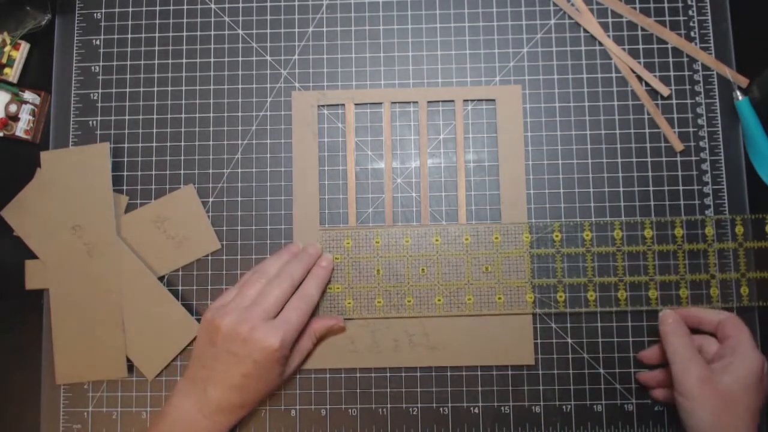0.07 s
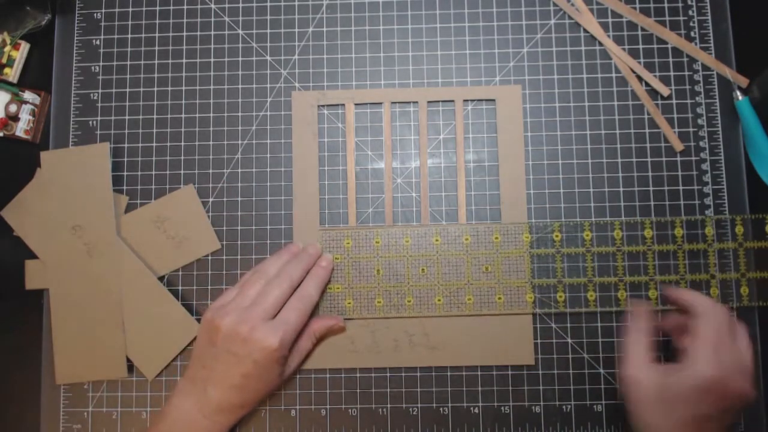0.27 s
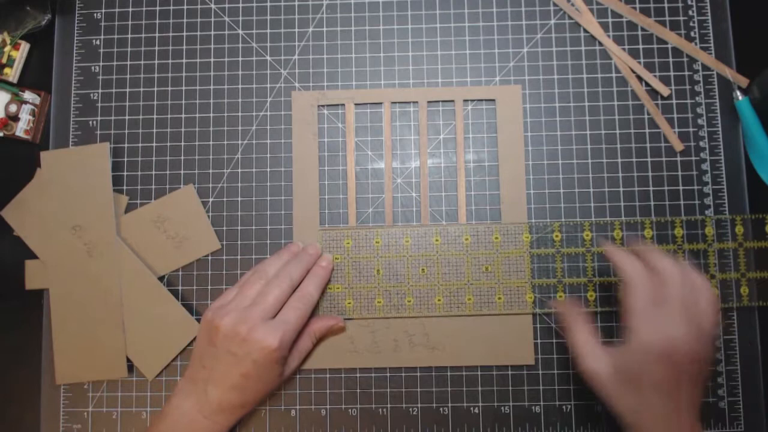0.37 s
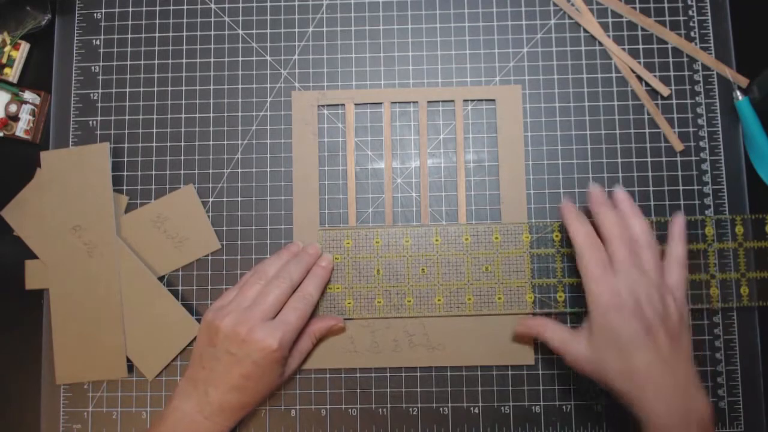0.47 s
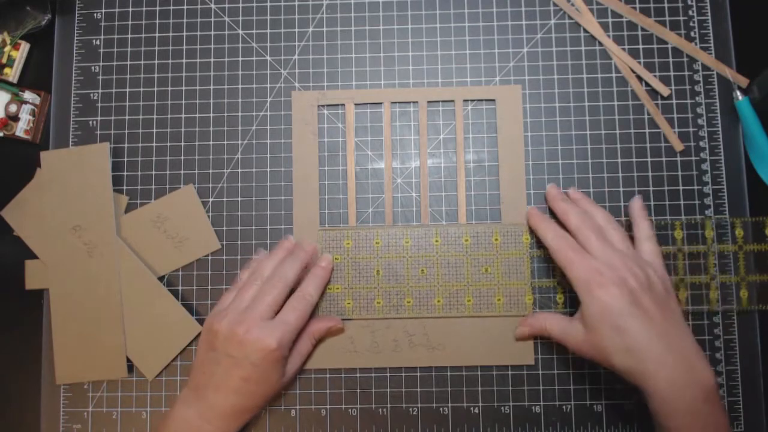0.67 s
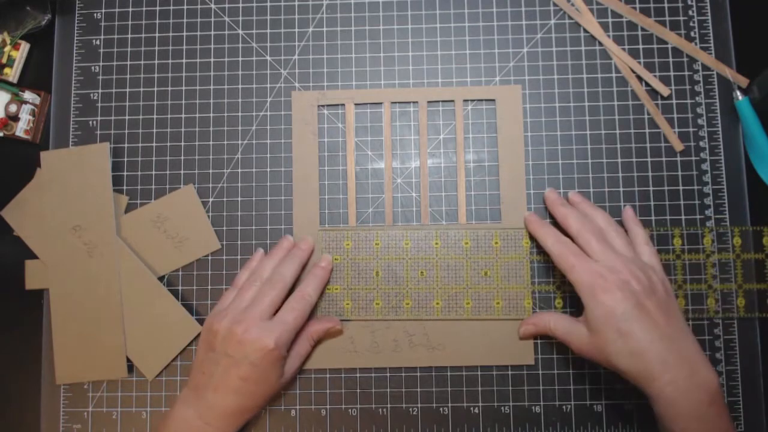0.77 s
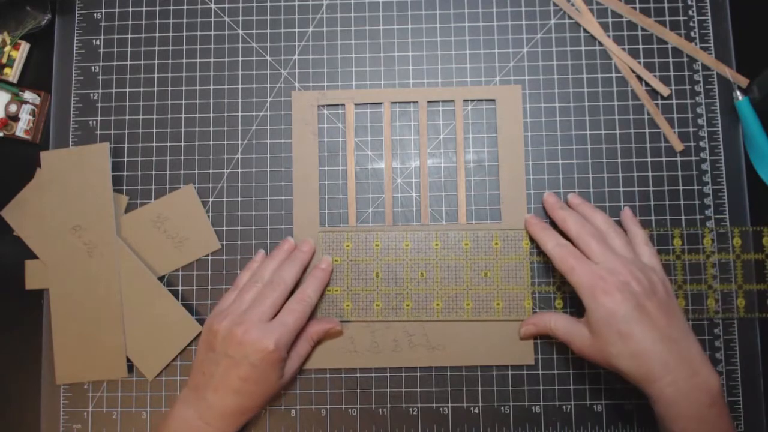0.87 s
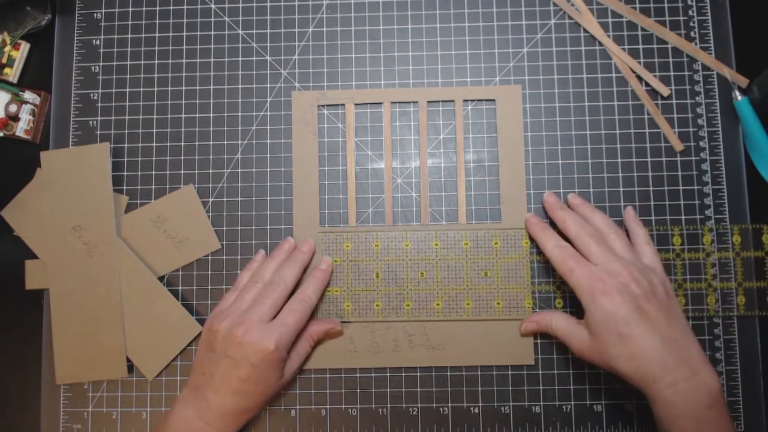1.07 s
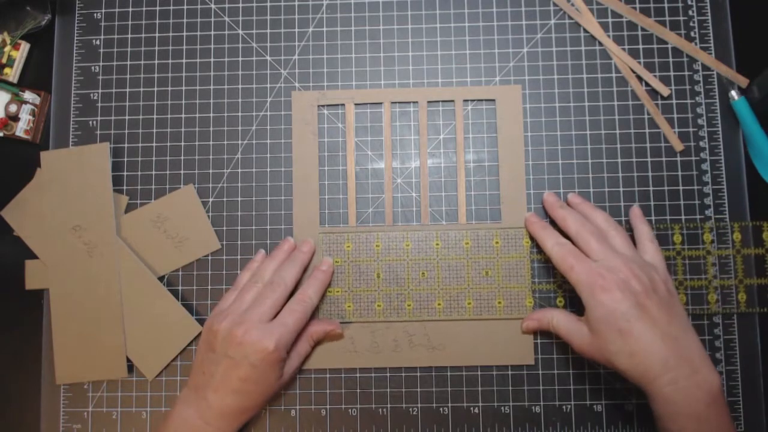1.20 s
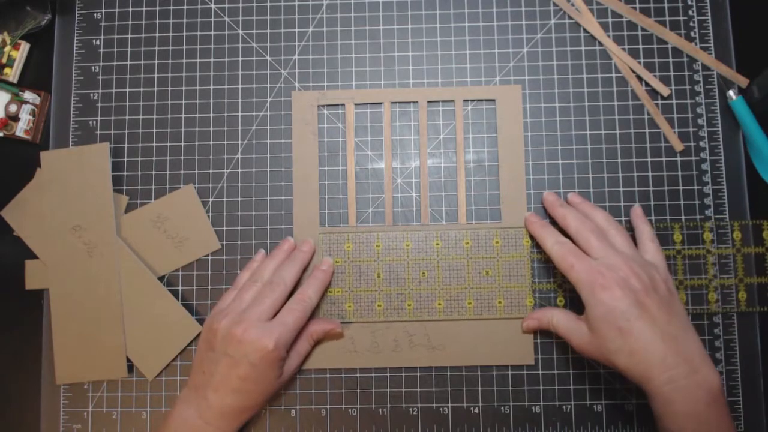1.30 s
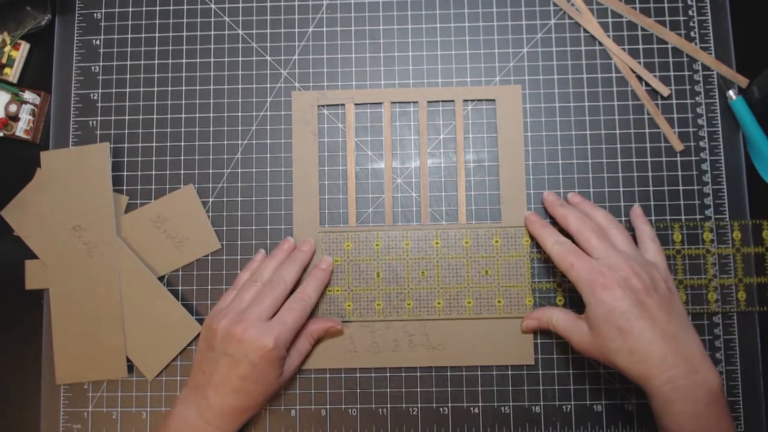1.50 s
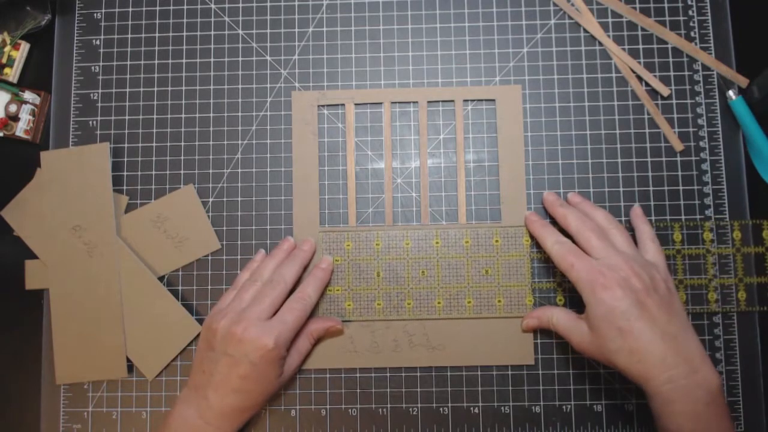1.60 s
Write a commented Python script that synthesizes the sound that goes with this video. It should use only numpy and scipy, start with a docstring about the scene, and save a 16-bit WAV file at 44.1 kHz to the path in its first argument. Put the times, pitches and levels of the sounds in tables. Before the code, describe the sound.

A flat plastic ruler hits a board panel on a table with two quick sharp taps, then after a pause slides briefly and clacks down duller; faint fingertip ticks follow, close microphone in a small quiet room.

```python
"""A clear acrylic ruler is set down on a board panel lying on a cutting mat: two sharp taps, then a short slide
and a duller clack as it is pressed flat, then light ticks and a dull fingertip touch.
Ruler contacts are damped modes plus a noise crack, and thump the modes of the table; slide, brushing hands
and ticks are coloured noise. A small room answers over a low hum and faint hiss."""
import sys
import numpy as np
from scipy import signal
from scipy.fft import rfft, irfft, next_fast_len
from scipy.io import wavfile
from scipy.ndimage import uniform_filter1d

SR = 44100
rng = np.random.default_rng(int(sys.argv[2]) if len(sys.argv) > 2 else 0)


def inscribe(sig):
    """Save sig as 16-bit PCM at rate SR to the path in sys.argv[1].

    A 1-D sig is mono; a 2-D sig holds one channel per row.
    Samples are clipped to [-1, 1] before scaling.
    """
    pcm = np.round(np.clip(np.atleast_2d(sig).T, -1, 1) * 32767)
    wavfile.write(sys.argv[1], SR, pcm.astype(np.int16))


N = 72765


def undb(db):
    """Decibels to gain."""
    return 10 ** (np.asarray(db) / 20)


def unit(x):
    """Scale to an rms of one."""
    return x / np.sqrt(np.mean(x ** 2))


def fade(t, t60_s):
    """Exponential decay, 60 dB down after t60."""
    return np.exp(-np.log(1000) * t / max(t60_s, 1e-4))


def since(start_s):
    """Seconds since a moment, zero before it."""
    return np.maximum(np.arange(N) / SR - start_s, 0)


def envelope(points):
    """Gain curve through (s, dB) points, straight in dB."""
    times_s, levels_db = np.array(points).T
    return undb(np.interp(since(0), times_s, levels_db))


def colour(x, points):
    """Minimum-phase filter through (Hz, dB) points, made causal by folding the cepstrum."""
    hz, db = np.array(points, float).T
    size = 2 * next_fast_len(N)
    bins_hz = np.maximum(np.fft.rfftfreq(size, 1 / SR), 1)
    log_gain = np.log(undb(np.interp(np.log(bins_hz), np.log(hz), db)))
    cepstrum = irfft(log_gain)
    cepstrum[1:size // 2] *= 2
    cepstrum[size // 2 + 1:] = 0
    response = np.exp(rfft(cepstrum))
    return irfft(rfft(x, size) * response)[:N]


def noise(points):
    """Coloured noise with an rms of one."""
    return unit(colour(rng.standard_normal(N), points))


def ring(t, modes):
    """Sum of exponentially damped sine modes (Hz, dB, t60 s)."""
    return sum(undb(db) * np.sin(2 * np.pi * hz * t) * fade(t, t60_s) for hz, db, t60_s in modes)


def background():
    """Room rumble and hiss as coloured noise, with a mains hum as one sine."""
    # Each row: frequency in Hz, spectral density in dB.
    hiss_colour = [(15, -45), (25, -13.5), (66, -3), (92, -15.5), (123, 2.5), (149, -16), (285, -22),
                   (354, -26), (439, -24.5), (503, -27.5), (818, -27.5), (962, -34.5), (1740, -31),
                   (2550, -38), (16000, -56.5)]
    hiss_db, hum_db, hum_hz = -57.5, -68, 120
    hum = unit(np.sin(2 * np.pi * hum_hz * since(0)))
    return undb(hiss_db) * noise(hiss_colour) + undb(hum_db) * hum


def brush():
    """Skin passing lightly over plastic and mat: a smooth bright hiss of varying level."""
    # Each row: frequency in Hz, spectral density in dB.
    brush_colour = [(500, -1.5), (2000, -7), (3400, 4), (5000, -2), (6800, 4.5), (8800, -6.5), (11000, -2),
                    (13500, -7.5), (16000, -6.5)]
    # Each row: time in seconds, level in dB.
    brush_level = [(0, -73), (0.037, -62.5), (.075, -72), (0.111, -75.5), (0.162, -68.5), (0.177, -54),
                   (.205, -61.5), (.33, -63), (0.413, -65), (.435, -82), (0.661, -75.5), (.77, -82),
                   (.83, -67.5), (0.879, -67.5), (.96, -59.5), (1.05, -76.5), (1.33, -81.5), (1.42, -70.5),
                   (1.5, -84.5), (1.65, -81)]
    return noise(brush_colour) * envelope(brush_level)


def table(t, column):
    """Boom of the table: damped modes, each building up over about its first cycle."""
    # Each row: frequency in Hz, level under a tap in dB, level under a press in dB, t60 in seconds.
    table_modes = [(38, -28, -39.5, 0.28), (60.97, -46, -35, 0.74), (73.68, -24, -24, 0.58),
                   (94.2, -28, -39.5, 0.14), (143.5, -37.5, -27.5, 0.23), (165.7, -28.5, -31, 0.12),
                   (239, -41.5, -52, 0.15), (340, -47.5, -43, 0.1695), (449, -49.5, -52, 0.33),
                   (511, -49, -54, 0.14), (630, -41, -43, 0.15)]
    rise_cycles = 0.53
    boom = np.zeros_like(t)
    for mode in table_modes:
        hz, db, t60_s = mode[0], mode[column], mode[-1]
        boom += ring(t, [(hz, db, t60_s)]) * (1 - np.exp(-t * hz / rise_cycles))
    return -boom


def hands():
    """Soft bumps of the hands on the table: slow pushes that reach only its lowest modes."""
    # Each row: start in seconds, level in dB, push length in seconds.
    bumps = [(0.047, -16, 0.018), (0.832, -8, 0.021), (0.8486, -3.5, 0.02), (.887, -16.5, 0.01067)]
    out = np.zeros(N)
    for start_s, db, length_s in bumps:
        push = np.sin(np.pi * np.minimum(since(start_s) / length_s, 1)) ** 2
        out += undb(db) * signal.fftconvolve(push / push.sum(), table(since(0), column=2))[:N]
    return out


def slide():
    """Uneven friction of ruler on board: a short squeak among the taps, a longer slide into the press."""
    # Squeak of the edge, then slide. Each row: frequency in Hz, spectral density in dB.
    squeak_colour = [(500, -22), (950, -13.5), (1200, -2.5), (1550, -6), (2800, -15.5), (3350, 8.5),
                     (3900, -11.5), (5200, -25), (6500, -10.5), (8000, -20.5), (16000, -29.5)]
    slide_colour = [(180, -9), (370, -5.5), (800, -9), (1200, 2.5), (1500, -10.5), (2150, 0.5),
                    (2750, -16.5), (3400, 0.5), (5100, -18.5), (6400, -3), (8000, -12.5), (9500, -18),
                    (16000, -29)]
    # Squeak, then slide. Each row: time in seconds, level in dB.
    squeak_level = [(0.129, -89.5), (0.151, -61.5), (.172, -62.5), (0.186, -52), (.197, -70), (.22, -91.5)]
    slide_level = [(.8, -98.5), (0.882, -56), (0.898, -51.5), (0.947, -48.5), (0.966, -60.5), (1.03, -87)]
    grain_depth = 0.55  # standard deviation of the log gain
    roughness = unit(uniform_filter1d(rng.standard_normal(N), size=50))
    grains = rng.standard_normal(N) * np.exp(grain_depth * roughness)
    squeak = unit(colour(grains, squeak_colour)) * envelope(squeak_level)
    return squeak + unit(colour(grains, slide_colour)) * envelope(slide_level)


def blows(events, modes, crack_colour, crack_db, rise_s, column):
    """Contacts ring the ruler (higher modes die sooner), crack and thump the table; returns direct, room spill."""
    centre_hz, ring_t60_s, ring_damping = 4000, 0.008, 0.25  # t60 at the centre, and its slope
    crack_t60_s = 0.015
    # the room hears the ruler from all sides: a broad snap and only part of its ring
    spill_snap_db, spill_click_db = -3, -7
    direct, spill = np.zeros(N), np.zeros(N)
    for start_s, ring_db, noise_db, thump_db, tilt_db in events:
        t = since(start_s)
        tilted_modes = []
        for hz, db in modes:
            t60_s = ring_t60_s * (centre_hz / hz) ** ring_damping
            tilted_modes.append((hz, db + tilt_db * np.log2(hz / centre_hz), t60_s))
        tilted_colour = [(hz, db + tilt_db * np.log2(hz)) for hz, db in crack_colour]
        tone = undb(ring_db) * ring(t, tilted_modes)
        crack = undb(crack_db + noise_db) * noise(tilted_colour) * fade(t, crack_t60_s)
        rise = 1 - np.exp(-(t / rise_s) ** 2)
        click = (tone + crack) * rise
        impulse = signal.unit_impulse(N, int(start_s * SR))
        snap = unit(colour(impulse, tilted_colour)) / np.sqrt(N)  # unit energy
        direct += click + undb(thump_db) * table(t, column)
        spill += undb(spill_click_db) * click + undb(spill_snap_db + ring_db) * snap
    return direct, spill


def taps():
    """The free ruler strikes the board: fast rise, bright modes."""
    # Each row: start in seconds, ring in dB, crack in dB, table thump in dB, treble tilt in dB per octave.
    tap_events = [(.1505, -48.5, -33.5, -46.5, 12.5), (.2106, 3.5, 5, 2.5, -0.5),
                  (.2146, -15, -18, -36.5, 7.5), (.2606, -1.5, -3.5, -4.5, -1.5)]
    # Each row: frequency in Hz, level in dB.
    ruler_modes = [(1150, -25.5), (1650, -33), (2040, -18), (3270, -11.5), (3680, -14), (4100, -27),
                   (4950, -29), (5480, -28.5), (5950, -9.5), (6400, -11), (7400, -33), (8280, -25),
                   (9040, -28), (11400, -30), (12400, -29)]
    # Each row: frequency in Hz, spectral density in dB.
    crack_colour = [(100, -5.5), (400, 3), (750, -5), (1100, -1.5), (1600, -4.5), (2100, 6), (2700, -6),
                    (3500, 7), (6500, -2), (9500, -9), (12500, -8), (13500, -13.5), (16000, -17.5)]
    return blows(tap_events, ruler_modes, crack_colour, crack_db=-17.5, rise_s=0.00061, column=1)


def presses():
    """The ruler is pressed onto the panel: slower rise, modes of the held ruler."""
    # Each row: start in seconds, ring in dB, crack in dB, table thump in dB, treble tilt in dB per octave.
    press_events = [(.9463, -14.5, -11, -26, -1), (.9502, -23, -12, -45.5, -0.5), (.9724, -0.5, 5, 1, -2),
                    (.9996, -16, -11, -37.5, -0.5)]
    # Each row: frequency in Hz, level in dB.
    held_modes = [(1170, -47), (2280, -9.5), (3300, -35.5), (4030, -9.5), (4750, -15.5), (6500, -21),
                  (6900, -36), (8250, -33), (11100, -30), (14700, -28)]
    # Each row: frequency in Hz, spectral density in dB.
    crack_colour = [(100, 0), (400, 2.5), (1100, -1), (1700, -8.5), (2300, -30.5), (2900, 3.5), (4200, 0.5),
                    (5700, -6), (7000, 0.5), (9500, -10.5), (11000, -5.5), (13000, -16.5), (16000, -17)]
    return blows(press_events, held_modes, crack_colour, crack_db=-21.5, rise_s=0.0013, column=2)


def fingers():
    """Fingertips settle: short decaying noise ticks on the plastic, one dull modal touch on the board."""
    # Each row: start in seconds, level in dB, t60 in seconds.
    tick_events = [(1.1327, -39.5, 0.018), (1.4099, -55, 0.019), (1.507, -60, 0.014), (1.602, -56.5, 0.014)]
    # Each row: frequency in Hz, spectral density in dB.
    tick_colour = [(150, -17), (500, 4), (1100, 3), (1600, 1), (2000, -18), (2350, 12.5), (2900, -6.5),
                   (3700, -2.5), (5500, -12.5), (6700, -13.5), (9000, -26.5), (16000, -20)]
    # Each row: frequency in Hz, level in dB, t60 in seconds.
    touch_modes = [(130, -43, 0.064), (165.6, -56.5, 0.2), (249.6, -59.5, 0.14), (395, -63, 0.073)]
    touch_s = 1.2775
    burst = noise(tick_colour)
    out = ring(since(touch_s), touch_modes)
    for start_s, db, t60_s in tick_events:
        t = since(start_s)
        out += undb(db) * burst * fade(t, t60_s) * (t > 0)
    return out


def room(x):
    """A few near echoes, quick scatter off the table top and a short diffuse tail."""
    # Each row: frequency in Hz, spectral density in dB.
    room_colour = [(60, -9.5), (250, 8.5), (600, 7), (1200, 3.5), (2500, 2), (6000, 0.5), (10000, -1),
                   (16000, -8)]
    # Nearby surfaces. Each row: delay in seconds, level in dB.
    reflections = [(.0112, -17.5), (0.0183, -20.5), (0.022, -30.5)]
    tail_db, tail_t60_s, tail_delay_s = -15.5, 0.18, 0.011
    scatter_db, scatter_t60_s = -14.5, 0.04
    late = since(tail_delay_s)
    tail = undb(tail_db) * unit(noise(room_colour) * fade(late, tail_t60_s) * (late > 0))
    scatter = undb(scatter_db) * unit(noise(room_colour) * fade(since(0), scatter_t60_s))
    echoes = sum(undb(db) * np.pad(x, (int(abs(delay_s) * SR), 0))[:N] for delay_s, db in reflections)
    return echoes + signal.fftconvolve(x, (tail + scatter) / np.sqrt(N))[:N]


def scene():
    """Ruler, table and hands in the room."""
    press_room_db = -4.5  # the hand covers the ruler, so less reaches the room
    tap_direct, tap_spill = taps()
    press_direct, press_spill = presses()
    handling = slide() + brush() + fingers()
    wet = room(handling + tap_spill + undb(press_room_db) * press_spill)
    return (tap_direct + press_direct + handling + wet + hands() + background())[None]


def record(dry):
    """The recorder cuts the top: a steep elliptic low-pass."""
    top_hz = 16300
    lowpass = signal.ellip(8, 0.2, 70, top_hz, fs=SR, output="sos")  # 0.2 dB ripple, 70 dB stop
    return signal.sosfilt(lowpass, dry)


dry = scene()
out = record(dry)
inscribe(out)
```